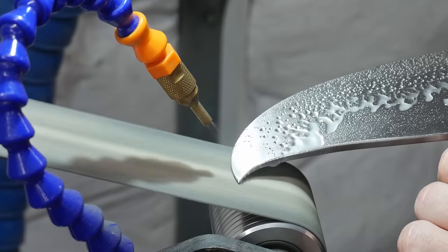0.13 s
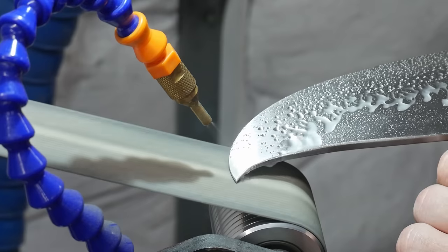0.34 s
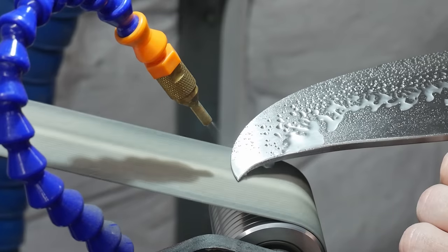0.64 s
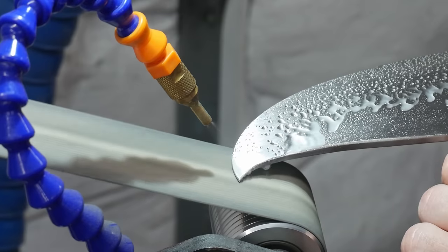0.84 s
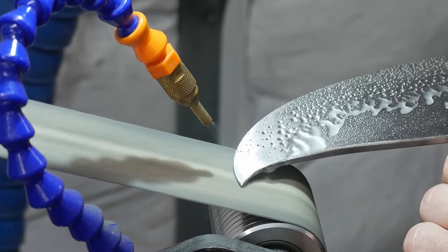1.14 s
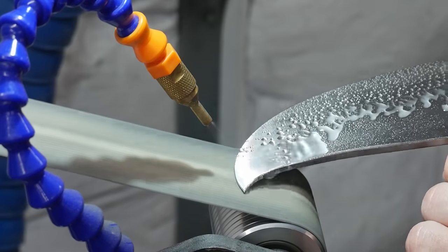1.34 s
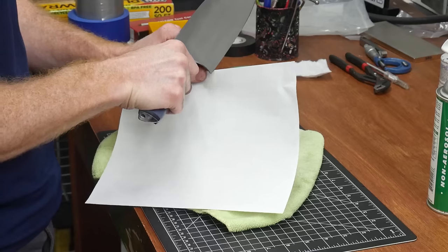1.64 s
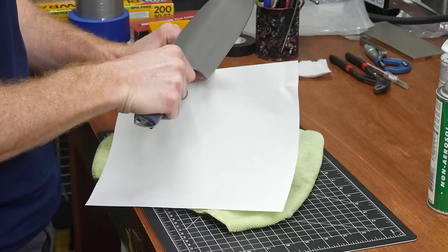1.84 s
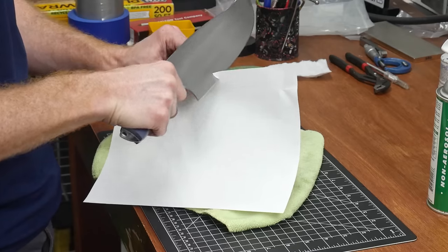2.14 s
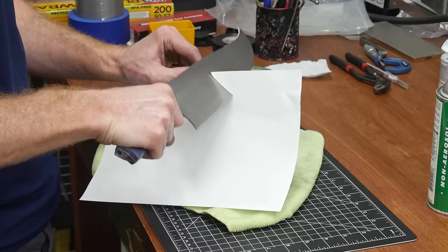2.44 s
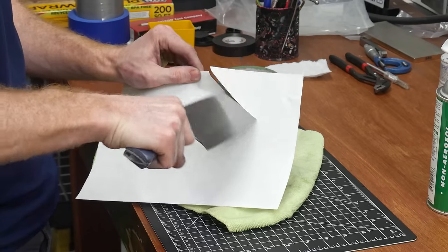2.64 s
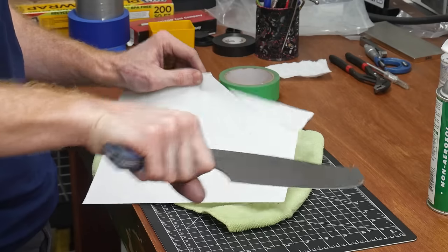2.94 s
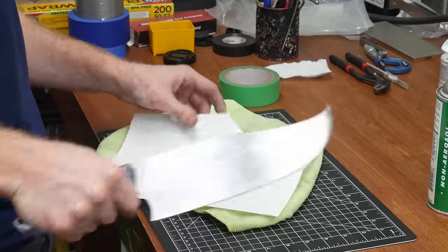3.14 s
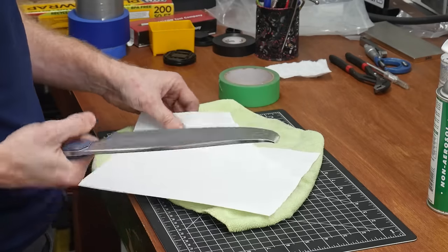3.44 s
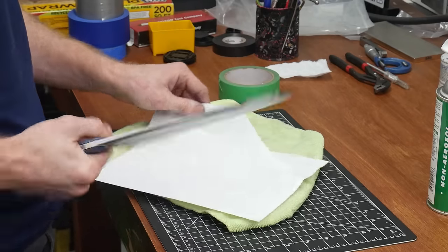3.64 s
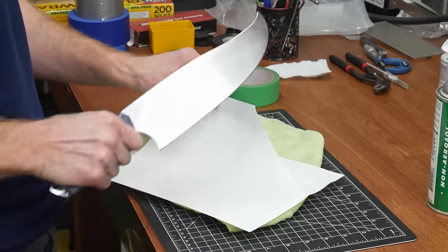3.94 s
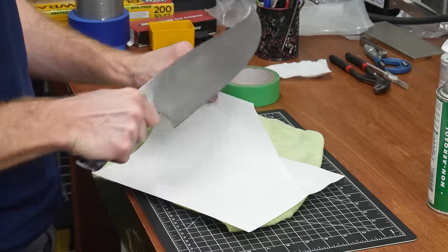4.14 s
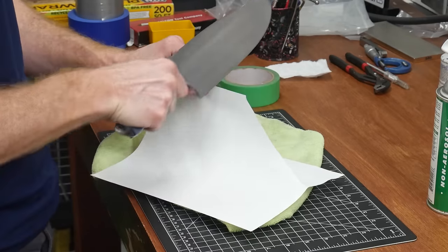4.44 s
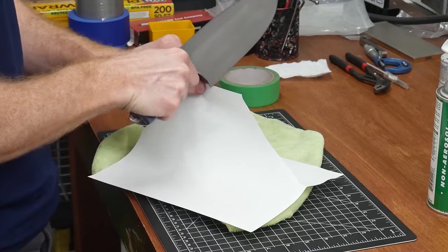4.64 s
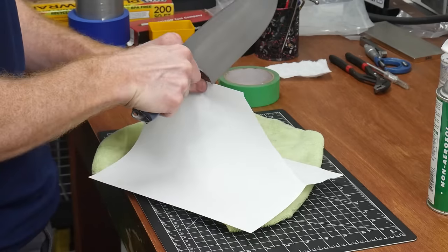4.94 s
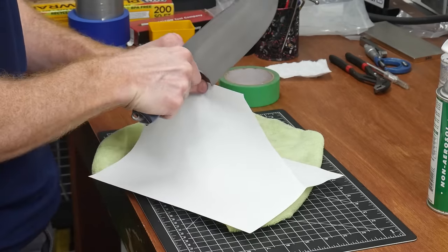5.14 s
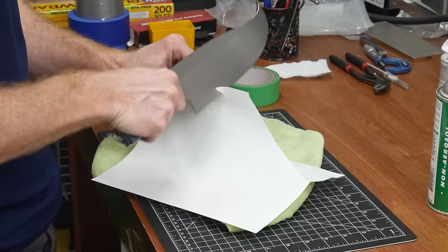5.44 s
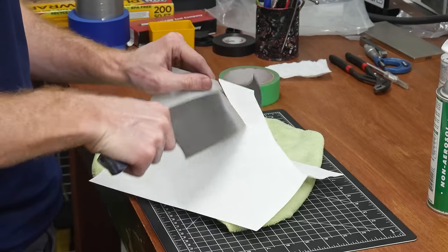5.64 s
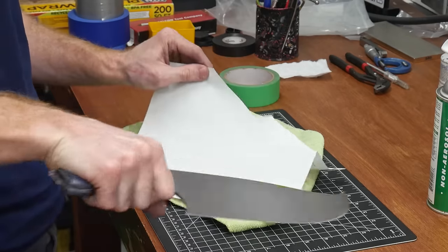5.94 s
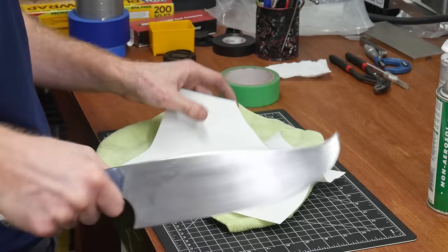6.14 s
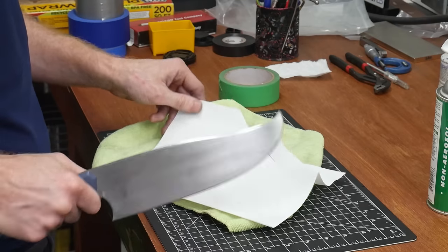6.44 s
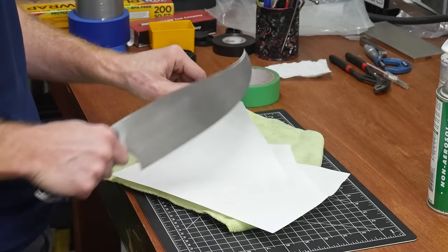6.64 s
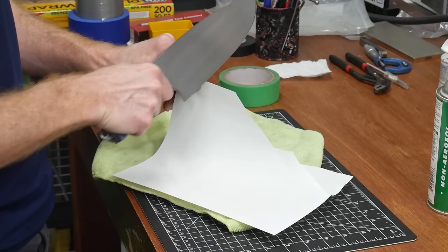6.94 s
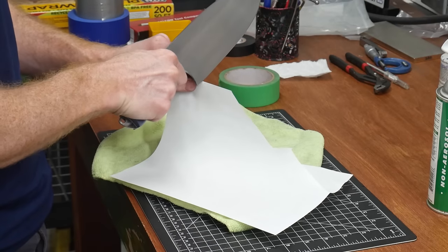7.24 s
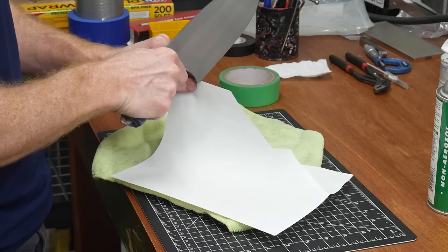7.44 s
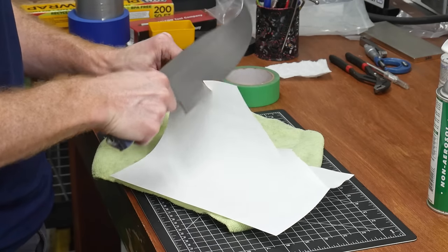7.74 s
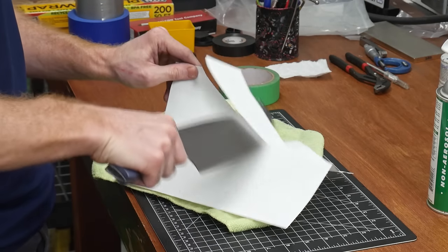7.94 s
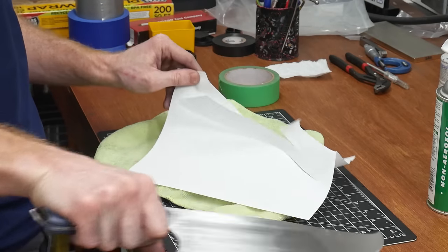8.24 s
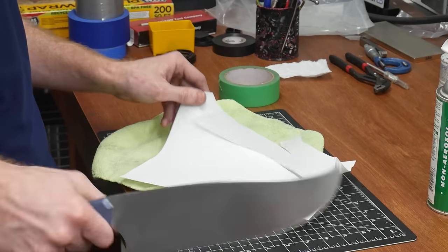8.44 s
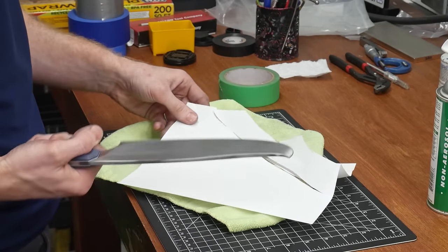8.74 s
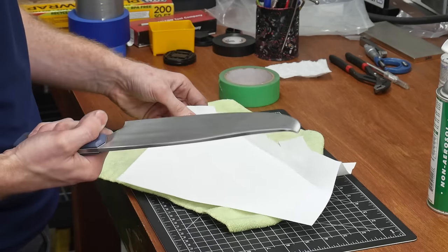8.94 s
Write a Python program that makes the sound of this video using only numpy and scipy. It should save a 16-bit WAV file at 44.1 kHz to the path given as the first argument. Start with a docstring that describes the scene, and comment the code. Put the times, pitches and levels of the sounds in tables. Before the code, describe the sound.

Bright gritty grinding with a wavering metallic whine cuts suddenly to a softly humming workshop, where paper rustles, snaps and is sliced by a sharp knife.

```python
"""A wet blade rides a grinding belt: grit hisses and the steel sings in a few wavering bands.
Abruptly the scene changes to a workbench in a small humming room, where a knife slices paper in four
cuts, the first two close together; between cuts the sheet is shifted, flicks and buckles.
Grit, fibres and crinkles are random snap trains through filters; singing and hum are narrow resonances
and tones; flicks are noise bursts; scattered echoes place the paper sounds in the room."""
import sys
import numpy as np
from scipy import signal
from scipy.fft import rfft, irfft
from scipy.io import wavfile
from scipy.ndimage import uniform_filter1d, map_coordinates

SR = 44100
rng = np.random.default_rng(int(sys.argv[2]) if len(sys.argv) > 2 else 0)


def file_out(sig):
    """Save sig as 16-bit WAV at sys.argv[1]."""
    # one column per channel
    cols = np.atleast_2d(sig).T
    # limit, then scale
    lim = np.clip(cols, -1, 1)
    pcm = np.round(lim * 32767).astype(np.int16)
    wavfile.write(sys.argv[1], SR, pcm)


N = 401310
TIME = np.arange(N) / SR  # s
HZ = np.fft.rfftfreq(N, 1 / SR)


def amp(db):
    """Decibels to gain."""
    return 10 ** (np.asarray(db) / 20)


def unit(x):
    """Scales to rms 1."""
    return x / np.sqrt(np.mean(x ** 2) + 1e-20)


def read(points, hz):
    """Interpolates a table on a log-frequency axis."""
    f, value = np.transpose(points)
    return np.interp(np.log(hz + 1), np.log(f + 1), value)


def add(mix, start_s, sound):
    """Adds a sound at a time, cut off at the end of the mix."""
    part = mix[round(start_s * SR):][:len(sound)]
    part += sound[:len(part)]


def colour(x, db):
    """Minimum-phase filter with gains db over HZ, peak normalised to 0 dB, floor -100 dB."""
    log_gain = np.log(amp(np.maximum(db - db.max(), -100)))
    mirrored = np.r_[log_gain, log_gain[-2:0:-1]]
    phase = -signal.hilbert(mirrored).imag[:len(HZ)]
    return irfft(rfft(x) * np.exp(log_gain + 1j * phase), N)


def drift(rate_hz):
    """Random wander of rms 1: noise low-passed at rate_hz."""
    return unit(irfft(rfft(rng.standard_normal(N)) / (1 + (HZ / rate_hz) ** 2), N))


def grains(per_s, spread_db):
    """Random train of one-sample snaps, a few much larger than the rest."""
    size = amp(spread_db * np.minimum(rng.exponential(1, N), 4))
    sign = rng.choice([-1, 1], N)
    return unit(size * sign * (rng.random(N) < per_s / SR))


def ring(hz, width_hz):
    """Resonance kept ringing by random pushes: narrow-band noise of rms 1."""
    return unit(irfft(rfft(rng.standard_normal(N)) / (1 + ((HZ - hz) / width_hz) ** 2), N))


# left-right difference: (frequency [Hz], level [dB])
SIDE_WIDTH = [(40, -5.5), (85, -11), (140, -6), (300, 2), (1000, -0.5), (4000, -4.5), (8000, -4.5),
              (13000, -0.5)]


def stereo(mid, side, side_db):
    """Left and right from a common part and an opposed part weighted by frequency."""
    opposed = irfft(rfft(side) * amp(side_db + read(SIDE_WIDTH, HZ)), N)
    return mid + np.array([[1], [-1]]) * opposed


# grit hiss spectrum: (frequency [Hz], relative density [dB per Hz])
GRIT_SPECTRUM = [(24, -58), (40, -31.5), (483, -22), (619, -20.5), (1050, -10.5), (1310, -9.5), (1760, -11),
                 (2980, -11.5), (3460, -4.5), (3720, -5), (5980, -7.5), (6770, -2.5), (7860, -11.5),
                 (8680, -9.5), (15400, -17.5)]
# hand pressure on the blade: (time [s], level [dB])
HAND_PRESSURE = [(0, -2), (.3, 0.5), (.55, 1), (.65, -2), (.73, 1.5), (1.0, -4.5), (1.1, 2.5), (1.19, 1),
                 (1.38, 2.5)]
# singing bands of the steel, before pressure:
# (frequency [Hz], width [Hz], level [dB], throb depth [dB])
SINGING_BANDS = [(3363, 17, -42.5, 3.5), (5070, 39, -49.5, -3), (6730, 29, -41, 3.5), (8490, 49, -43.5, 2)]
# weaker resonances of blade, wheel and motor, before flutter: (frequency [Hz], width [Hz], level [dB])
WEAK_MODES = [(83.4, 2.1, -81), (288, 46, -69), (483, 28, -67), (1055, 35, -55), (1788, 46, -50.5),
              (3430, 6.6, -51.5), (6600, 61, -48), (9700, 58, -50.5), (9970, 51, -50), (10500, 66, -49.5),
              (11660, 58, -50.5), (13160, 200, -51)]
GRIT_DB, GRIT_PRESSURE_SHARE = -36.5, 0.078
THROB_HZ, SING_SWELL_DB, SING_SWELL_HZ = 16, 2, 12


def grinding():
    """Grit scratches the steel; harder pressure makes its narrow, throbbing bands sing louder."""
    belt_flutter = amp(0.38 * drift(30) + 0.54 * np.sin(2 * np.pi * 52.5 * TIME))  # belt runs unevenly
    pressure_db = np.interp(TIME, *np.transpose(HAND_PRESSURE))
    hiss = unit(colour(grains(14000, 2.0), read(GRIT_SPECTRUM, HZ)))
    out = hiss * amp(GRIT_DB + GRIT_PRESSURE_SHARE * pressure_db)
    for hz, width_hz, db, throb_db in SINGING_BANDS:
        tone = ring(hz, width_hz)
        envelope = np.sqrt(abs(uniform_filter1d(tone ** 2, size=2000)) + 1e-9)
        steady = tone / envelope  # friction holds the swing steady
        throb = np.sin(2 * np.pi * (THROB_HZ * TIME + 0.33 * drift(1.8)))
        swell_db = SING_SWELL_DB * drift(SING_SWELL_HZ)
        out = out + steady * amp(db + pressure_db + throb_db * throb + swell_db)
    for hz, width_hz, db in WEAK_MODES:
        out = out + amp(db) * ring(hz, width_hz)
    return belt_flutter * out


# air noise spectrum: (frequency [Hz], relative density [dB per Hz])
AIR_SPECTRUM = [(25, -39), (60, -17.5), (110, -11), (170, -15.5), (230, -21.5), (300, -22.5), (420, -26),
                (800, -30), (2000, -34), (7660, -41), (15400, -46)]
# fan tones: (frequency [Hz], level [dB])
FAN_TONES = [(82.7, -61), (60, -72.5)]
# rumbling resonances: (frequency [Hz], width [Hz], level [dB])
RUMBLE_MODES = [(62.7, 4.6, -77), (129, 30, -66.5), (264, 13.4, -74.5)]
AIR_DB = -61.5


def background():
    """Ventilation fan: filtered air noise, low tones of wandering phase and noise-driven rumble."""
    air = amp(AIR_DB) * unit(colour(rng.standard_normal((2, N)), read(AIR_SPECTRUM, HZ)))
    mid = air[0]
    for hz, db in FAN_TONES:
        mid = mid + amp(db) * np.sqrt(2) * np.sin(2 * np.pi * hz * TIME + 0.49 * drift(1.5))
    for hz, width_hz, db in RUMBLE_MODES:
        mid = mid + amp(db) * ring(hz, width_hz)
    return stereo(mid, air[1], side_db=4.0)


# resonances of sheet and blade above the bench: (frequency [Hz], width [Hz], lift [dB])
SHEET_MODES = [(369.4, 44, 5.5), (536, 54, 7), (719, 42, 11), (998, 96, 6), (1267, 87, 4), (1500, 190, 0.5),
               (1669, 31, 7), (1986, 53, 8), (2297, 133, 4), (2626, 40, 3.5), (2760, 66, 4),
               (3027, 33, 3.5), (3287, 63, 1.5), (4600, 110, 2), (5100, 91, 3), (5500, 67, 4)]


def sheet_db():
    """Resonant lift over HZ, shared by the paper sounds."""
    return sum(db / (1 + (2 * (HZ - hz) / width_hz) ** 2) for hz, width_hz, db in SHEET_MODES)


def flex(x, depth, patch_db):
    """The sheet bends: its resonances wander and patches of it sound louder for a moment."""
    bend = depth * np.sin(2 * np.pi * (2.7 * TIME + .12 * drift(3.04)))
    read_at = np.cumsum(1 + bend - bend.mean())
    x = map_coordinates(x, [read_at], order=3, mode="wrap")
    z = signal.stft(x, nperseg=256)[2]
    patches = uniform_filter1d(rng.standard_normal(z.shape), size=5, axis=0)
    patches = unit(uniform_filter1d(patches, size=9, axis=1))
    return signal.istft(z * amp(patch_db * patches), nperseg=256)[1][:N]


STROKE_EDGE_DB, STROKE_FADE_S = -7, 0.031  # edge level relative to peak; fade beyond each edge


def stroke(start_s, peak_s, end_s, db):
    """Gain of one hand movement: speeds up to its peak, then slows down."""
    away = np.interp(TIME, [start_s, peak_s, end_s], [1, 0, 1])
    fade_times_s = [start_s - STROKE_FADE_S, start_s, end_s, end_s + STROKE_FADE_S]
    fade = np.interp(TIME, fade_times_s, [0, 1, 1, 0])
    return amp(db + STROKE_EDGE_DB * away ** 1.67) * fade


# sliding spectrum: (frequency [Hz], relative density [dB per Hz])
SLIDE_SPECTRUM = [(180, -45), (300, -9), (391, -10.5), (508, -21), (707, -6), (876, -12.5), (1020, -5),
                  (1780, 0), (2000, 2), (4620, -1), (10400, -12), (15400, -21.5)]
# sheet slides under the fingers:
# (start [s], fastest [s], end [s], level [dB], treble swish relative to the rub [dB])
SHEET_SLIDES = [(1.446, 1.53, 1.58, -57, -4), (1.8, 1.82, 1.86, -47.5, 10.5), (1.87, 2.014, 2.23, -43.5, 8),
                (2.98, 3.142, 3.24, -62, 7), (3.138, 3.33, 3.596, -60, -0.5), (3.46, 3.53, 3.75, -49, 3.5),
                (3.84, 3.99, 4.21, -58, 1), (6.142, 6.446, 6.82, -51, -0.5), (7.248, 7.289, 7.42, -58, -1),
                (8.504, 8.563, 8.6, -51, 2.5), (8.602, 8.803, 8.92, -57.5, -1), (9.03, 9.078, 11, -63, 4)]
SWISH_ABOVE_HZ = 6000


def sliding():
    """Paper drags over cloth and skin with small crinkles; treble swish follows hand speed."""
    crinkles = amp(-14) * grains(43, 2.8)
    drag = grains(6000, 2.0) * amp(1.0 * drift(47)) + crinkles
    coloured = colour(drag, read(SLIDE_SPECTRUM, HZ) + .5 * sheet_db())
    rub = unit(flex(coloured, depth=0.022, patch_db=2.0))
    swish = irfft(rfft(rub) * (1 - 1 / (1 + (HZ / SWISH_ABOVE_HZ) ** 6)), N)
    low_rub = rub - swish
    out = np.zeros(N)
    for start_s, peak_s, end_s, db, swish_db in SHEET_SLIDES:
        speed = stroke(start_s, peak_s, end_s, 0)
        out += amp(db) * speed * (low_rub + amp(swish_db) * speed ** 0.92 * swish)
    return out


# flicks of the sheet and touches of the edge:
# (time [s], relative level [dB], centre [Hz], decay time constant [s])
SHEET_FLICKS = [(1.693, -54.5, 1460, 0.074), (1.804, -37.5, 1170, 0.043), (1.829, -32.5, 1070, 0.0051),
                (1.86, -37.5, 980, 0.0087), (1.898, -48, 610, 0.11), (2.089, -32, 1120, 0.031),
                (2.244, -31, 770, 0.016), (2.666, -33.5, 600, 0.027), (2.743, -23.5, 830, 0.0062),
                (3.284, -42, 2800, 0.0034), (3.766, -42, 2223, .008), (3.776, -33.5, 1170, 0.0082),
                (4.081, -49, 1290, 0.056), (4.215, -52, 1690, 0.025), (4.279, -50.5, 1800, 0.031),
                (4.338, -50.5, 2140, 0.025), (4.434, -49, 2190, 0.018), (5.198, -55, 1300, 0.013),
                (5.269, -42.5, 2690, 0.053), (5.294, -34.5, 1510, 0.028), (5.311, -26, 1190, 0.015),
                (5.33, -19.5, 2830, 0.0063), (6.06, -42.5, 2420, 0.047), (6.078, -44.5, 930, 0.037),
                (6.82, -47, 2980, 0.025), (7.22, -53, 730, .008), (7.252, -47, 2080, 0.068),
                (7.567, -29.5, 1640, 0.094), (7.61, -20.5, 1960, 0.0037), (7.646, -17.5, 1600, 0.01),
                (7.663, -28.5, 900, 0.0078), (7.683, -27, 4500, .02), (8.183, -44, 600, 0.012),
                (8.947, -48.5, 2005, 0.017)]
FLICK_RISE_SHARE = 0.099  # of the decay time constant


def flicking():
    """Each flick is a decaying noise burst around its own pitch, through the sheet resonances."""
    out, t = np.zeros(N), np.arange(SR // 4) / SR
    hz = np.fft.rfftfreq(len(t), 1 / SR) + 1
    for start_s, db, centre_hz, decay_s in SHEET_FLICKS:
        band = 1 / np.sqrt(1 + 1.2 * (hz / centre_hz - centre_hz / hz) ** 2)
        band = band / np.sqrt(1 + (hz / 7000) ** 4)
        crackle = unit(irfft(rfft(rng.standard_normal(len(t))) * band, len(t)))
        envelope = np.minimum(t / (FLICK_RISE_SHARE * decay_s), 1) * np.exp(-t / decay_s)
        add(out, start_s, amp(db) * crackle * envelope)
    return amp(8.0) * colour(out, 1.12 * sheet_db())


# fibre snap spectrum: (frequency [Hz], relative density [dB per Hz])
FIBRE_SPECTRUM = [(88, -52), (150, -23), (209, -19.5), (373, -12.5), (605, -14.5), (707, -10), (842, -10),
                  (964, -6.5), (1170, -2.5), (1970, 0), (2130, -2), (4810, -1), (7820, -19.5), (9860, -18),
                  (15400, -31.5)]
# flutter of the sheet, body, rip of the fibres, fizz of the edge:
# (relative level [dB], gain along the cut [dB], gain as the edge leaves the rim [dB], release [dB/s])
BAND_SHAPES = [(-15.5, -3.5, 4, 129), (-1.5, -2, -1, 159), (-12, 10.5, -5.5, 146), (-11, 6, 6, 182)]
# edge strokes: (bite [s], full speed [s], end [s], relative level at full speed [dB],
# drop at the bite [dB], drop at the end [dB], rip offset [dB], fizz offset [dB], exit length [s])
EDGE_CUTS = [(1.97, 2.037, 2.119, -32, 9, 5, -4.5, -15, .01),
             (2.217, 2.349, 2.798, -27, 6, 3, -1.5, -3, .16),
             (5.308, 5.603, 5.819, -25.5, 12.5, 3, 0.5, -1, 0.041),
             (7.664, 7.9, 8.089, -23.5, 8, 3.5, 0, -0.5, 0.19)]
# edge scrapes: (start [s], strongest [s], end [s], level [dB])
EDGE_SCRAPES = [(1.8, 1.87, 1.95, -46), (1.982, 2.088, 2.15, -40.5), (2.264, 2.33, 2.39, -38)]
BITE_RAMP_S = 0.057
RASP_HZ, RASP_WIDTH_HZ, RASP_LIFT_DB = 5000, 7200, 0.99
SCRAPE_HZ, SCRAPE_WIDTH_HZ = 1060, 72


def slicing():
    """The edge scrapes the taut sheet and snaps fibres by the thousand, in four shaped bands."""
    snaps = grains(9000, 1.87) * amp(0.56 * drift(69) + 0.32 * drift(6))
    rasp_db = RASP_LIFT_DB / (1 + (2 * (HZ - RASP_HZ) / RASP_WIDTH_HZ) ** 2)
    shape_db = read(FIBRE_SPECTRUM, HZ) + sheet_db() + rasp_db
    spectrum = rfft(flex(colour(snaps, shape_db), depth=0.01193, patch_db=2.0))
    # broad sheet gives the low part, torn fibres the middle, the edge itself the top
    below = [1 / (1 + (HZ / hz) ** 10) for hz in (900, 3400, 6500)]
    masks = np.diff([0 * HZ, *below, 1 + 0 * HZ], axis=0)
    bands = [unit(irfft(spectrum * mask, N)) for mask in masks]
    out = np.zeros(N)
    for bite_s, full_s, end_s, db, bite_drop_db, end_drop_db, rip_db, fizz_db, exit_s in EDGE_CUTS:
        speed_db = np.interp(TIME, [bite_s, full_s, end_s], [db - bite_drop_db, db, db - end_drop_db])
        speed = np.clip((TIME - bite_s) / BITE_RAMP_S + .5, 0, 1) * amp(speed_db)
        along = np.interp(TIME, [bite_s, end_s], [0, 1])
        leaving = np.interp(TIME, [end_s - exit_s, end_s], [0, 1])
        after_s = np.clip(TIME - end_s, 0, 1)
        offsets_db = (0, 0, rip_db, fizz_db)
        for band, offset_db, row in zip(bands, offsets_db, BAND_SHAPES):
            band_db, along_db, exit_db, release_db_per_s = row
            gain_db = band_db + offset_db + along_db * along + exit_db * leaving
            out += band * speed * amp(gain_db - release_db_per_s * after_s)
    scrape_gain = sum(stroke(*row) for row in EDGE_SCRAPES)
    return out + ring(SCRAPE_HZ, SCRAPE_WIDTH_HZ) * scrape_gain


# buckle spectrum: (frequency [Hz], relative density [dB per Hz])
BUCKLE_SPECTRUM = [(100, -53), (150, -28), (380, -12), (545, -19.5), (714, -15.5), (1380, -8.5), (1620, 1),
                   (1800, -8.5), (2060, -1), (3030, -13), (4290, -14.5), (7000, -30), (10500, -37),
                   (15000, -49)]
# quick run of snaps: (time [s], peak level [dB])
BUCKLE_SNAPS = [(3.7892, -18.5), (3.7897, -27), (3.7913, -9.5), (3.7927, -17), (3.7942, -13)]


def buckling():
    """The bent sheet pops through in a run of filtered impulses within 5 ms, then shivers."""
    shape_db, t = read(BUCKLE_SPECTRUM, HZ), np.arange(SR // 5) / SR
    snap = colour(signal.unit_impulse(N), shape_db)[:len(t)]
    out = np.zeros(N)
    for start_s, db in BUCKLE_SNAPS:
        add(out, start_s, amp(db) * snap / abs(snap).max())
    shiver = unit(colour(grains(4000, 1.8), shape_db + .4 * sheet_db()))[:len(t)]
    add(out, BUCKLE_SNAPS[0][0], amp(-32) * shiver * np.exp(-t / 0.047))
    return out


# reverberation of the room: (frequency [Hz], time to fall 60 dB [s])
REVERB_T60 = [(150, 0.33), (500, 0.7), (2000, 0.69), (5000, 0.76), (9000, 0.61), (15000, 0.23)]


def room(x, wet_db, side_db):
    """Scattered reflections from bench and walls, decaying at a rate set by frequency."""
    taps = rng.standard_normal((2, SR)) * (rng.random((2, SR)) < 4000 / SR)
    hz, t, z = signal.stft(taps, SR, nperseg=256)
    decay = amp(-60 * t / read(REVERB_T60, hz)[:, None])
    tail = signal.istft(z * decay, SR, nperseg=256)[1][:, :SR]
    t = np.arange(SR) / SR
    tail = tail * (t > .002) * (1 + 3.4 * np.exp(-t / 0.011))  # near surfaces answer first and loudest
    tail = tail / np.linalg.norm(tail, axis=1, keepdims=True)
    mid, side = signal.fftconvolve(x[None], tail, axes=1)[:, :N]
    return stereo(x + amp(wet_db) * mid, side, side_db)


GRIND_END_S, CHANGE_S = 1.407, 0.0055


def scene():
    """First the grinder, then the bench, joined by a very short crossfade."""
    grinder = stereo(grinding(), grinding(), side_db=-7.0)
    paper = slicing() + sliding() + flicking() + buckling()
    balance = amp([[-.3], [.3]])  # left, right dB
    bench = room(paper, wet_db=-5.0, side_db=-8.0) * balance + background()
    changed = np.clip((TIME - GRIND_END_S) / CHANGE_S + .5, 0, 1)
    return grinder * (1 - changed) + bench * changed


NOTCH_HZ, NOTCH_HALF_WIDTH_HZ, BAND_LIMIT_HZ = 7860, 55, 15450


def record(dry):
    """Narrow treble notch, then a linear-phase low-pass."""
    notch = 1 - .95 / (1 + ((HZ - NOTCH_HZ) / NOTCH_HALF_WIDTH_HZ) ** 4)
    notched = irfft(rfft(dry) * notch, N)
    low_pass = signal.firwin(511, BAND_LIMIT_HZ, window=("kaiser", 9), fs=SR)
    return signal.oaconvolve(notched, low_pass[None], "same")


dry = scene()
out = record(dry)
file_out(out)
```